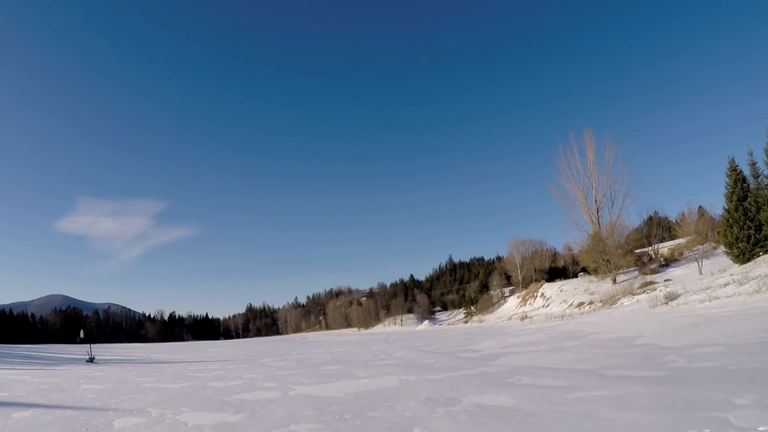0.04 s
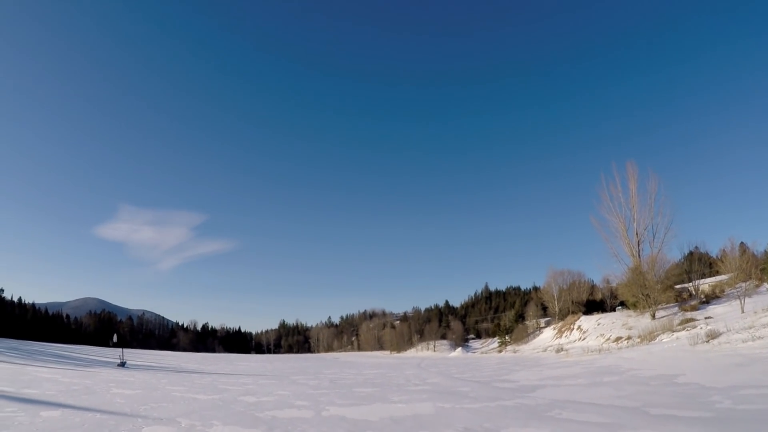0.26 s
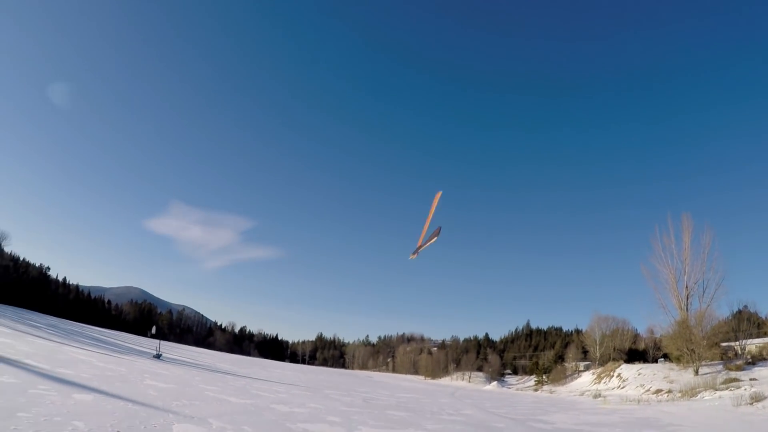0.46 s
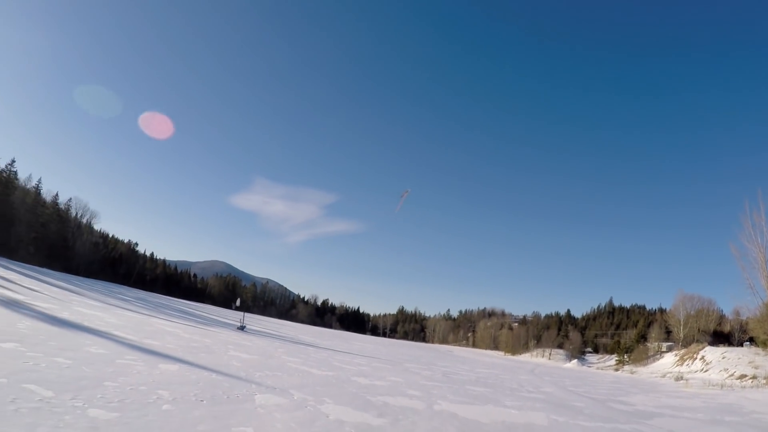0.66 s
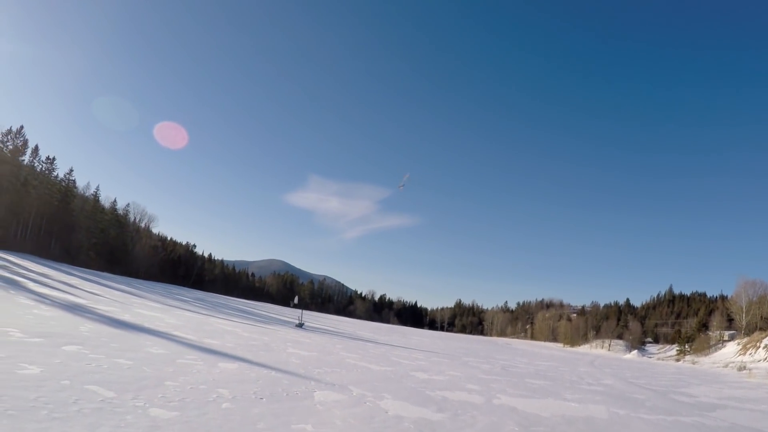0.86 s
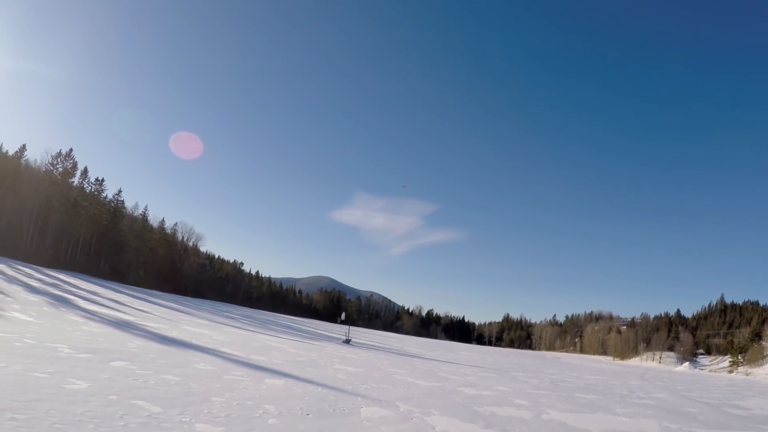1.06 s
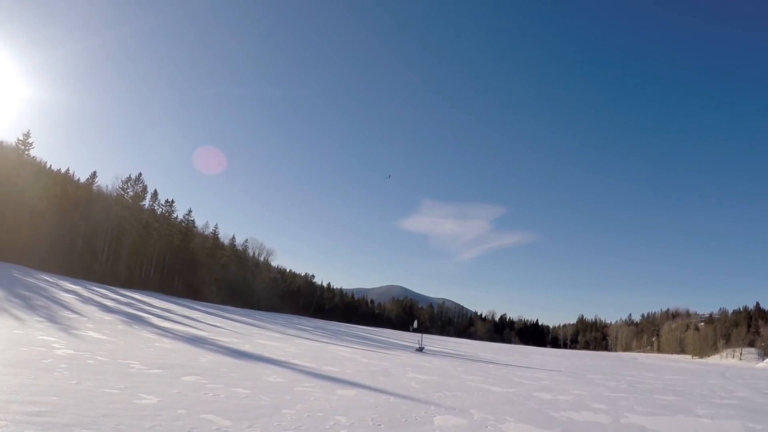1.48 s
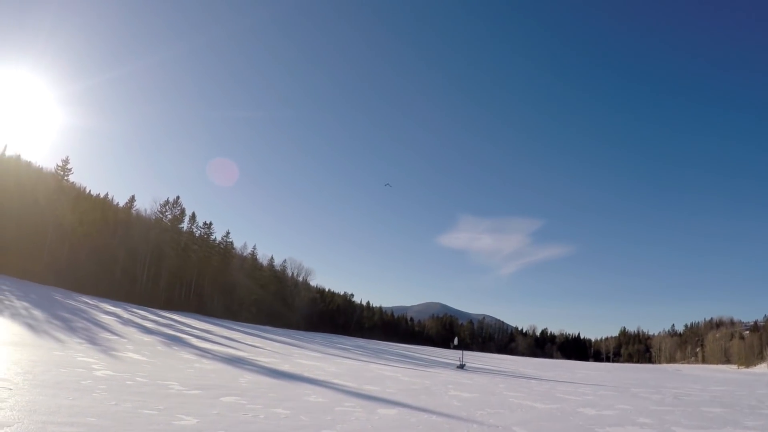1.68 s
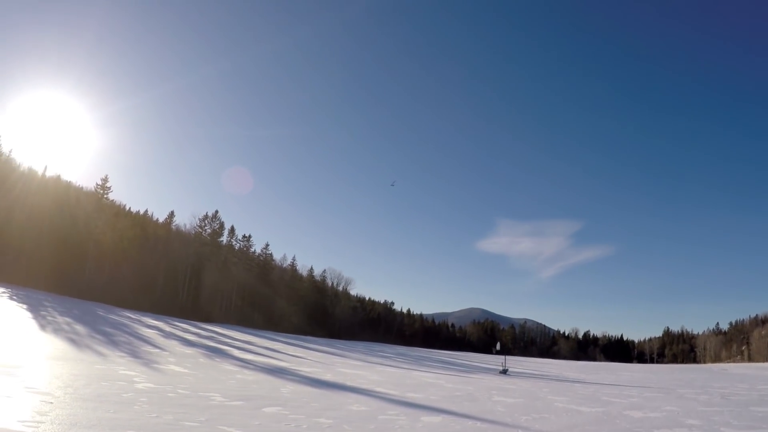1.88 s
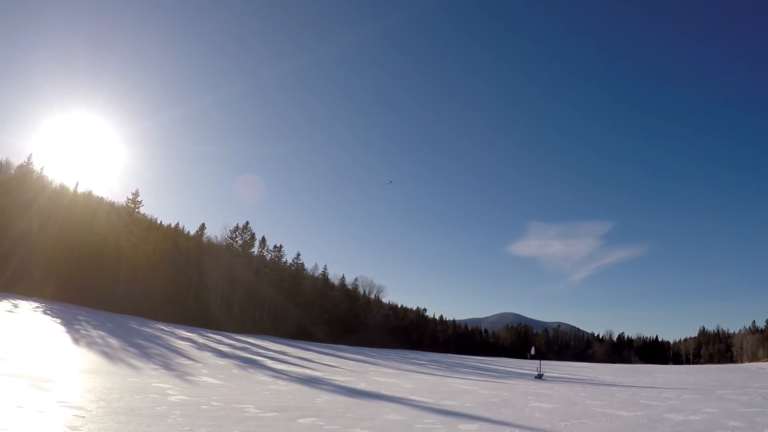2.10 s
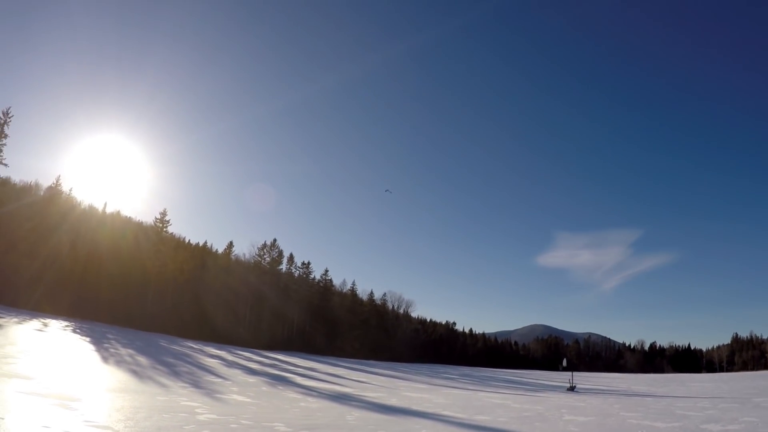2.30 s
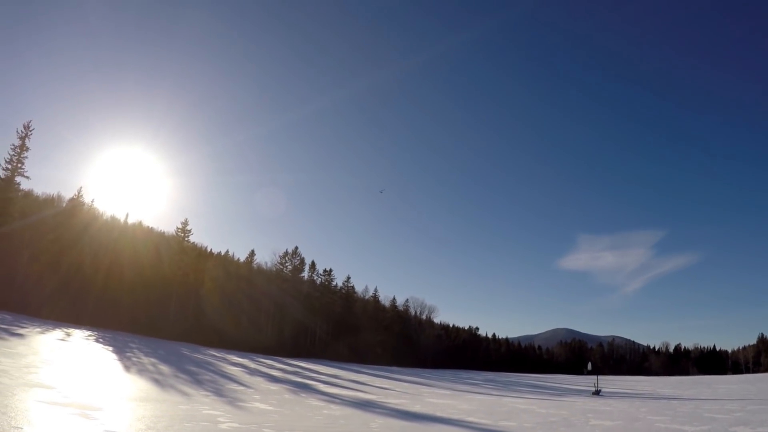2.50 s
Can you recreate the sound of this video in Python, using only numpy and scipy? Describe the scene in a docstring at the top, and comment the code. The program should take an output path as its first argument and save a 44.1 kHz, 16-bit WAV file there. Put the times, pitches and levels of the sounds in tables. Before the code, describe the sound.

A quick whoosh and puff of air pass the microphone as a boomerang is thrown and hisses away. Around it, shifting steps in a snowy field make short, hollow crunches and knocks over a low wind rumble.

```python
"""A snowy field, where a boomerang is thrown, heard from a body-worn camera in a plastic case.
Low wind and a faint electrical whine form the bed. Packed snow and gear creak in short, hollow
knocks that ring the case. A sleeve rustles, the arm sweeps past with a puff of air, and the
spinning blades fade away in a pulsing hiss."""
import sys
import numpy as np
from scipy import signal
from scipy.fft import rfft, irfft
from scipy.io import wavfile

SR = 44100
rng = np.random.default_rng(int(sys.argv[2]) if len(sys.argv) > 2 else 0)


def materialize(psi):
    """Save the field psi as 16-bit PCM at rate SR to the path in sys.argv[1].

    A 1-D psi becomes a single channel; in a 2-D psi each row is a channel.
    """
    bounded = np.clip(np.atleast_2d(psi).T, -1, 1)
    quanta = np.round(bounded * 32767).astype(np.int16)
    wavfile.write(sys.argv[1], SR, quanta)


N = 116865


def undb(db):
    """Decibels to gain."""
    return 10 ** (np.asarray(db) / 20)


def clock():
    """Time of every sample in seconds."""
    return np.arange(N) / SR


def fader(points):
    """A gain ride through (t/s, level/dB) points."""
    return undb(np.interp(clock(), *np.array(points).T))


def noise(colour):
    """Unit noise shaped by (f/Hz, level/dB) points, rolled off below the first."""
    hz, db = np.array(colour).T
    f = np.maximum(np.arange(N // 2 + 1) * SR / N, 1)
    eq = undb(np.interp(np.log(f), np.log(hz), db))
    low_cut = np.minimum(f / hz[0], 1) ** 2
    y = irfft(rfft(rng.standard_normal(N)) * eq * low_cut, N)
    return y / y.std()


def band(hz, width_hz):
    """Unit noise through one resonance."""
    f = np.arange(N // 2 + 1) * SR / N
    y = irfft(rfft(rng.standard_normal(N)) / (1 + (2 * (f - hz) / width_hz) ** 2), N)
    return y / y.std()


def flutter(rate_hz, depth_db):
    """A gain that wanders at random within +/- depth_db."""
    knots = np.tanh(rng.standard_normal(N // 10))
    return undb(depth_db * np.interp(clock() * rate_hz, np.arange(len(knots)), knots))


def swell(at, rise_s, fall_s):
    """A bell-shaped envelope that peaks at the given time."""
    t = clock() - at
    return np.exp(-.5 * (t / np.where(t < 0, rise_s, fall_s)) ** 2)


def add(out, at, sound):
    """Mix a sound in at a time in seconds."""
    i = int(np.clip(at * SR, 0, N - 1))
    out[i:i + len(sound)] += sound[:N - i]


def blip(t, rise_s):
    """A rounded attack and quick decay, reaching 1 at rise_s."""
    return (t / rise_s) ** 2 * np.exp(2 * (1 - t / rise_s))


def knock(t, hz, rise_s, sag=0.01, roundness=1.81):
    """A few cycles of a heavily damped resonance whose pitch sags as it dies."""
    from_peak = t - rise_s
    cycles = hz * from_peak * (1 - sag * np.tanh(from_peak / rise_s))
    return blip(t, rise_s) ** roundness * np.cos(2 * np.pi * cycles)


def wind():
    """Low wind rumbles on the microphone."""
    # rumble colour: f/Hz, relative level/dB
    colour = [(15, -9), (28, 3.5), (38, 3.5), (50, -8.5), (68, 0), (82, -14), (98, -21.5), (140, -24.5),
              (300, -52)]
    # rise and fall of the wind: t/s, level/dB
    gusts = [(0, -47.5), (.3, -43), (.7, -46.5), (.9, -45.5), (1.1, -48.5), (1.5, -48), (2.0, -48),
             (2.2, -45.5), (2.65, -48.5)]
    return noise(colour) * fader(gusts)


def open_air():
    """The soft, gently wavering hush of distant air."""
    # air colour: f/Hz, relative level/dB
    colour = [(100, -33), (170, -12.5), (272, -1.5), (347, -7), (514, -3.5), (564, -0.5), (643, -1.5),
              (836, 1), (1290, -14.5), (1550, -15.5), (2350, -21.5), (6450, -27.5), (8390, -28.5),
              (15000, -38.5)]
    # slow swell of the air: t/s, relative level/dB
    ride = [(0, 1), (.5, 2), (1.05, -0.5), (1.55, 0), (1.85, 0), (2.3, 2), (2.65, 1.5)]
    return noise(colour) * undb(-55) * fader(ride) * flutter(rate_hz=19, depth_db=1.74)


def camera_whine():
    """Thin, wavering electrical tones, with a narrow hiss around the lower one."""
    # whine tones: f/Hz, RMS level/dB
    tones = [(8630, -79), (14087, -92)]
    out = np.zeros(N)
    for hz, db in tones:
        tone = np.sqrt(2) * np.sin(2 * np.pi * hz * clock())
        out += undb(db) * flutter(rate_hz=6.2, depth_db=2.5) * tone
    return out + undb(-78) * band(tones[0][0], width_hz=700)


def case_ring(t, detune=0.032):
    """The plastic case rings after a tap, its modes tuned a little differently each time."""
    # case modes: f/Hz, relative level/dB, t60/s
    modes = [(832, -6.5, 0.053), (1102, 4, 0.017), (1770, -10, 0.032), (2320, -21, 0.0071),
             (2950, -19.5, 0.059), (3895, -23, 0.059), (4900, -59.5, 0.019)]
    ring = np.zeros(len(t))
    for hz, db, t60 in modes:
        detuned_hz = hz * (1 + detune * rng.standard_normal())
        ring += undb(db - 60 * t / t60) * np.sin(2 * np.pi * detuned_hz * t)
    return ring


def case_bumps():
    """Dull, padded pushes on the case."""
    # soft bumps: t/s, level/dB
    bumps = [(0.238, -30.5), (.275, -33.5), (0.39, -36), (0.651, -27.5), (0.92, -40), (2.151, -46),
             (2.473, -34), (2.528, -44.5)]
    out, t = np.zeros(N), clock()[:SR // 20]
    for at, db in bumps:
        add(out, at, -undb(db) * knock(t, hz=139, rise_s=0.0034))
    return out


def gear_clicks():
    """Small, hard taps of gear ring the case, each with a tick of hiss."""
    # gear taps: t/s, relative level/dB
    taps = [(0.278, -31), (.427, -37), (0.724, -33), (0.7254, -31), (0.92, -42), (1.445, -39),
            (2.0449, -32.5), (2.15, -32.5), (2.2996, -30), (2.3018, -46)]
    mount_damping_db, hiss_db, hiss_decay_s = 4, -16.5, .002
    rings, hiss_envelope, t = np.zeros(N), np.zeros(N), clock()[:SR // 20]
    for at, db in taps:
        add(rings, at, undb(db - mount_damping_db) * case_ring(t))
        add(hiss_envelope, at, undb(db + hiss_db) * np.exp(-t / hiss_decay_s))
    return rings + hiss_envelope * band(3000, width_hz=10400)


def snow_crunch(grains_per_s=270, grain_hz=707, scatter_db=5):
    """Snow packs under shifting weight in loose clusters of tiny knocks."""
    # grain clusters: centre t/s, half length/s, level/dB
    clusters = [(0.245, 0.0067, -39.5), (0.325, 0.011, -40), (0.433, 0.027, -42.5), (.485, 0.017, -40),
                (0.543, .015, -47.5), (1.596, .015, -41.5), (1.721, 0.027, -34.5), (1.797, 0.00795, -43.5),
                (1.968, 0.018, -40.5), (2.191, 0.0094, -40.5), (2.388, 0.011, -39)]
    out, t = np.zeros(N), clock()[:SR // 20]
    for centre, half, db in clusters:
        grains = rng.uniform(-1, 1, (100, 3))
        count = int(2 * half * grains_per_s) + 1
        for k, (late, size, pitch) in enumerate(grains[:count]):
            at = centre - half + (k + .5 * late) / grains_per_s
            grain = knock(t, grain_hz * np.exp(.25 * pitch), rise_s=0.001636)
            add(out, at, undb(db + scatter_db * size) * grain)
    return out


def creaks(ring_db=-34, thud_hz=360, thud_gain_db=2.5, grit_gain_db=8.5):
    """Each slip of snow or gear gives a hollow knock, a lower thud, a faint case ring and grit."""
    # slips: t/s, level/dB, f/Hz, rise/ms, relative grit level/dB, relative thud level/dB
    slips = [(0.1, -39.5, 870, 1.4, -70, -65), (0.117, -26.5, 740, 1.4, -59.5, -49),
             (0.2396, -28.5, 674, 1.58, -58.5, -28.5), (0.258, -24, 675, 2.6, -59, -33),
             (0.277, -35, 646, 1.27, -54, -36), (0.2909, -19, 817, 2, -51, -45),
             (0.3145, -35.0, 676, 2.1, -75, -47), (0.3558, -35, 830, 2.14, -63, -47),
             (0.373, -40, 830, 2.3, -79, -51), (0.3811, -17, 710, 1.83, -49.5, -28),
             (0.3849, -20.5, 810, 1.57, -64, -36), (0.3866, -22.5, 690, 2.09, -64, -30.5),
             (0.4714, -46, 863, 2.2, -65, -53), (0.4852, -35, 709, 2.07, -66, -38),
             (0.4917, -34, 647, 1.4, -59, -45), (0.5274, -39, 732, 1.6, -64, -53),
             (0.7326, -29.6, 840, 1.33, -67, -53), (0.743, -35, 786, 1.22, -61, -55),
             (0.7464, -22, 777, 2.54, -53.5, -44.5), (0.8741, -30.5, 695, 2.12, -61.5, -53),
             (0.886, -29.5, 830, 2.03, -65, -67), (0.897, -37, 750, 1.44, -56.5, -40),
             (0.9172, -18, 717, 2.32, -51.5, -78), (0.9697, -33, 510, 2, -62, -47.5),
             (1.6148, -32, 685, 2.2, -61.5, -50.5), (1.6272, -22.5, 680, 2.1, -59.5, -35),
             (1.6882, -23.5, 772, 1.9, -58.5, -50), (1.6928, -16.5, 674, 2.1, -61, -29.5),
             (1.697, -33, 640, 2.52, -55, -34), (1.7088, -28, 827, 2.33, -58, -67),
             (1.7175, -35, 730, 2, -61, -37.5), (1.7305, -45, 735, 1.9, -63, -41),
             (1.7415, -33, 702, 2, -78, -61), (1.76, -33, 677, 2, -73, -46),
             (1.8614, -34.5, 580, 2.4, -56.5, -37), (1.8669, -33, 600, 1.92, -64, -46),
             (1.8706, -33.5, 740, 2.33, -80, -57.5), (2.0051, -14.1, 618, 3.41, -50, -31.5),
             (2.0108, -12.5, 737, 2.06, -59, -38), (2.0147, -23.5, 654, 2.11, -58, -29),
             (2.0653, -18, 760, 1.56, -54.5, -59), (2.0677, -25.5, 760, 2.94, -70, -52),
             (2.1088, -21, 726, 1.39, -55.5, -60), (2.1508, -19.5, 717, 2.75, -46.5, -28.5),
             (2.1567, -25.5, 746, 1.28, -63, -57), (2.2418, -26.5, 700, 1.85, -58, -58),
             (2.3761, -28.5, 830, 1.86, -59.5, -67), (2.3883, -21.5, 580, 1.87, -56, -43),
             (2.3997, -30, 830, 2.46, -58.5, -40.5), (2.418, -28.1, 764, 1.36, -59, -44),
             (2.4718, -35, 670, 2.16, -65, -66)]
    # grit colour: f/Hz, relative level/dB
    grit_colour = [(300, 10), (900, 18.5), (1500, 18), (2300, 4.5), (3500, -4), (5300, 6.5), (8000, -12),
                   (15000, -22)]
    body, grit_envelope, t = np.zeros(N), np.zeros(N), clock()[:SR // 20]
    for at, db, hz, rise_ms, grit_db, thud_db in slips:
        rise_s = rise_ms / 1000
        add(body, at, undb(db) * (knock(t, hz, rise_s) + undb(ring_db) * case_ring(t)))
        add(body, at, undb(thud_db + thud_gain_db) * knock(t, thud_hz, rise_s))
        add(grit_envelope, at, undb(grit_db + grit_gain_db) * blip(t, rise_s=0.0032))
    return body + grit_envelope * noise(grit_colour)


def throw(puff_s=.6305, puff_hz=21.5):
    """The sleeve rustles, the arm whooshes past and puffs air at the microphone, the wood slips free."""
    # cloth colour: f/Hz, relative level/dB
    sleeve_colour = [(60, 13), (160, 5.5), (260, 1), (750, 3), (1150, -2.5), (1500, -11.5), (2700, -9.5),
                     (3600, -22), (4800, -15), (10000, -26), (15000, -32)]
    # rustle of the moving sleeve: t/s, level/dB
    sleeve_ride = [(0, -90), (.22, -72), (.35, -60.5), (.41, -47), (.45, -48), (.49, -45), (.57, -48),
                   (.66, -65), (.7, -53), (.9, -67.5), (1.05, -82)]
    # colour of the arm's whoosh: f/Hz, relative level/dB
    whoosh_colour = [(40, 9.5), (140, 8.5), (250, -3.5), (360, 1), (470, -1.5), (700, 2.5), (1000, -3.5),
                     (1450, -18.5), (2000, -16.5), (2700, -12.5), (3300, -22.5), (5000, -27.5),
                     (10000, -40), (15000, -42)]
    # bright swish of the release: f/Hz, relative level/dB
    slip_colour = [(2000, -12), (4500, -2), (7000, -1), (10500, 4.5), (13000, -7), (15500, -13)]
    sleeve = noise(sleeve_colour) * fader(sleeve_ride) * flutter(rate_hz=110, depth_db=6)
    whoosh = noise(whoosh_colour) * undb(-30) * swell(0.6253, rise_s=0.015, fall_s=0.029)
    whoosh *= flutter(rate_hz=200, depth_db=3.5)
    pressure = np.sin(2 * np.pi * puff_hz * (clock() - puff_s))
    puff = pressure * undb(-23) * swell(puff_s, rise_s=0.036, fall_s=0.036)
    slip = noise(slip_colour) * undb(-44) * swell(.6495, rise_s=.007, fall_s=.0025)
    return sleeve + whoosh + puff + slip


def boomerang(launch_s=0.678, spin_hz=21.1, spin_depth=.35):
    """The spinning blades hiss in pulses and hum briefly as they recede."""
    # colour of the blade hiss: f/Hz, relative level/dB
    blade_colour = [(200, -13), (800, 10.5), (1100, 10.5), (1450, -8), (2000, 5), (3100, 0.5), (4300, -9.5),
                    (7000, -23), (15000, -34)]
    flight_s = np.maximum(clock() - launch_s, 0)
    spin = 1 + spin_depth * np.cos(2 * np.pi * spin_hz * flight_s)
    hiss = noise(blade_colour) * undb(-49) * blip(flight_s, rise_s=0.065) * spin
    hum = band(151, width_hz=30) * undb(-41) * swell(0.706, rise_s=0.035, fall_s=0.035)
    return hiss + hum


def scene():
    """Foley, throw and ambient bed, mixed in mono at the microphone."""
    foley = creaks() + case_bumps() + gear_clicks() + snow_crunch()
    action = throw() + boomerang()
    bed = wind() + open_air() + camera_whine()
    return (foley + action + bed)[None]


def record(dry, cutoff_hz=15400):
    """The camera cuts the top end with a steep low-pass."""
    return signal.sosfilt(signal.ellip(10, .2, 70, cutoff_hz, fs=SR, output="sos"), dry)


dry = scene()
out = record(dry)
materialize(out)
```